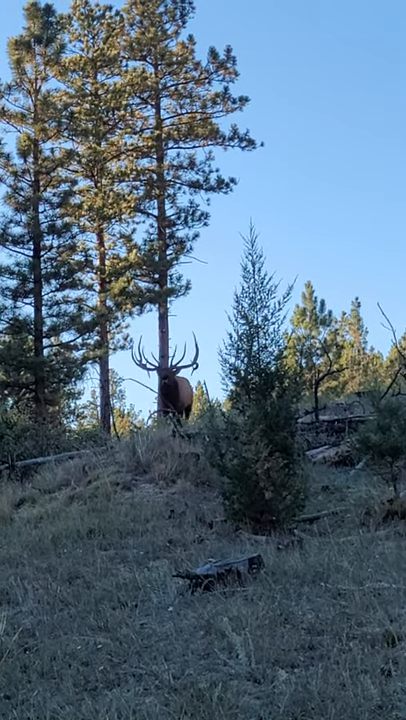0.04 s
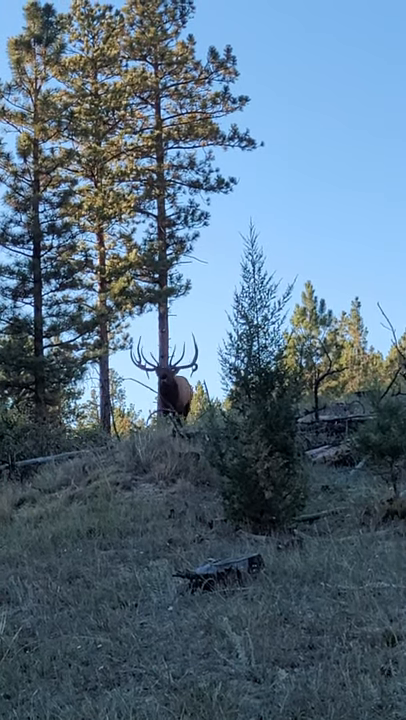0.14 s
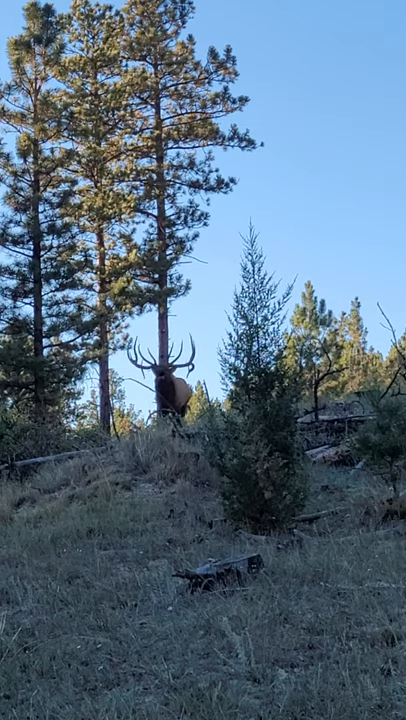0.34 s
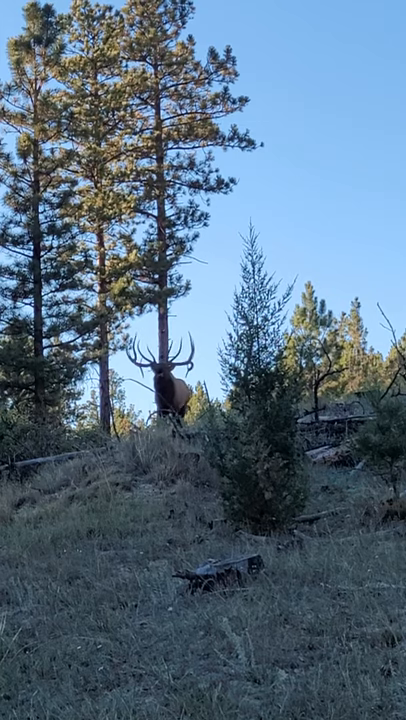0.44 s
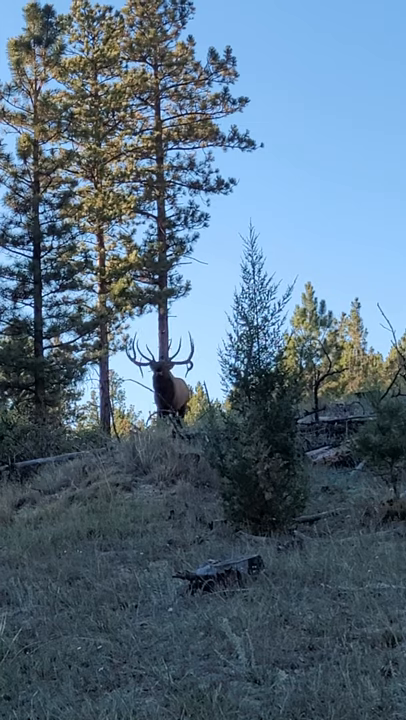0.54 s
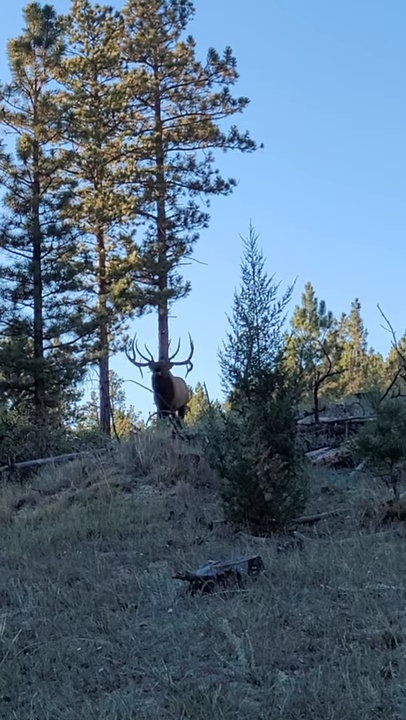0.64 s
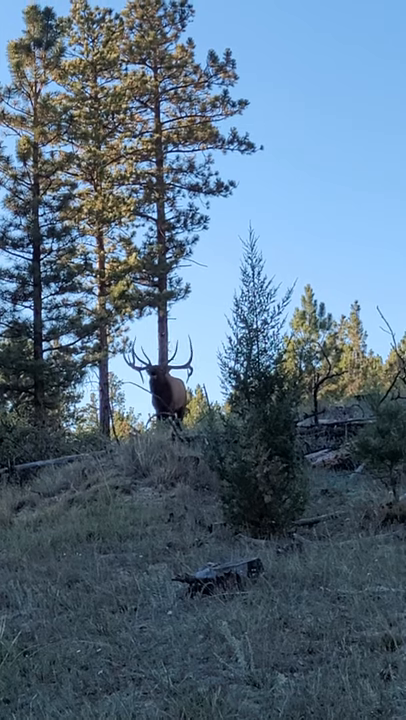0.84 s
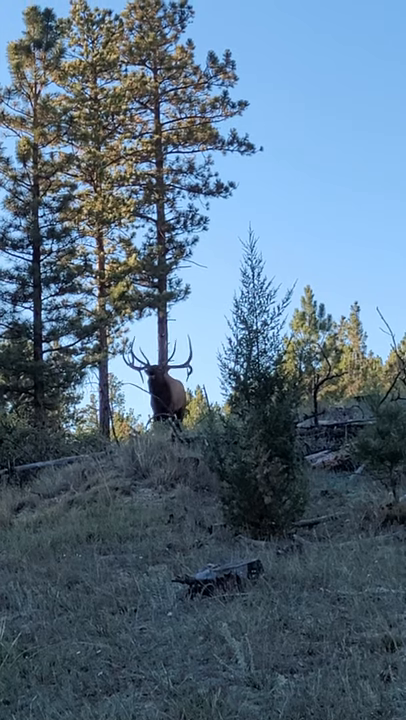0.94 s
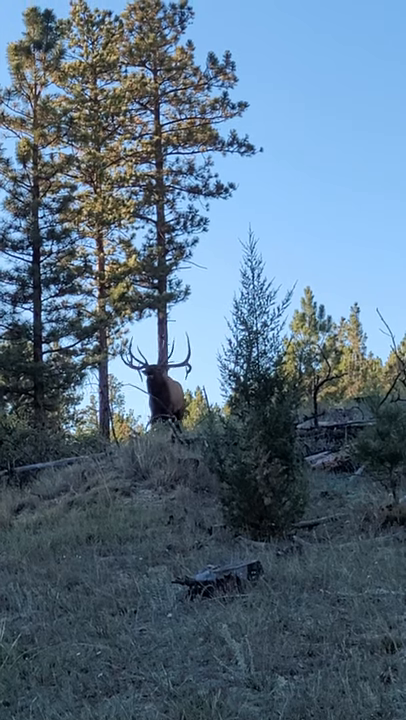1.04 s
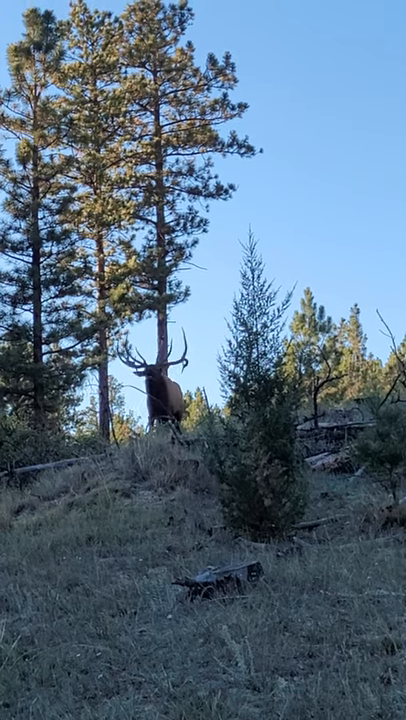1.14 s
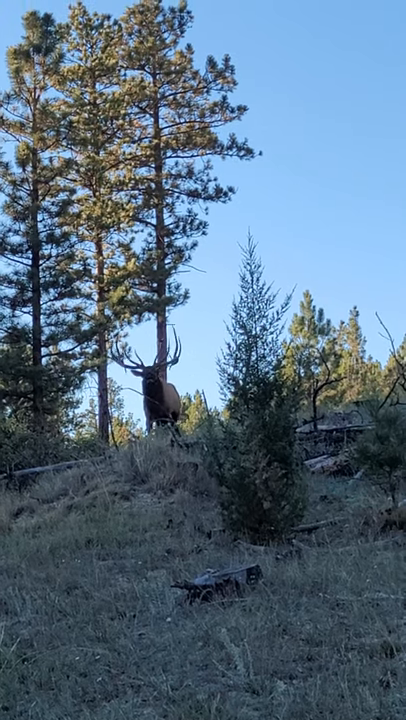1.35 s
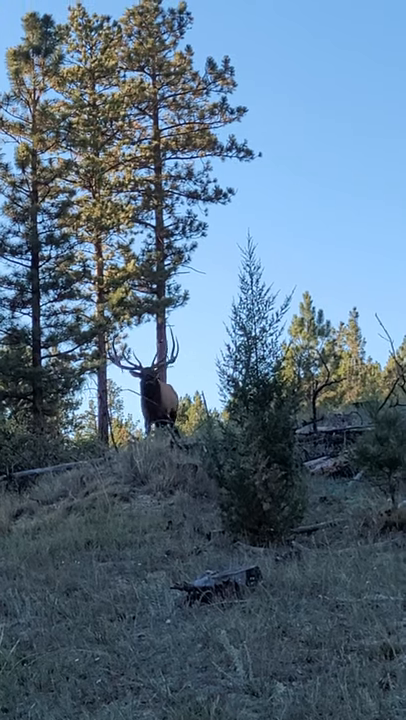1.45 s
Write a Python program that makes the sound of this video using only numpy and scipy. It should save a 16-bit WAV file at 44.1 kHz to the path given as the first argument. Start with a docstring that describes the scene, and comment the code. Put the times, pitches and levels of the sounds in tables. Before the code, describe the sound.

A bull elk bugles in still open air. From 0 s a low growl and breathy rasp roughen a whistle near 900 Hz, which steps upward with small cracks. By about 0.6 s the growl fades; the whistle clears and climbs to a loud, piercing scream near 2.2 kHz around 1.0-1.1 s. It plunges into a short grunt, stopping by 1.2 s, leaving faint echo and thin hiss.

```python
"""A bull elk bugles from a wooded ridge. A low, rough growl and a high whistle sound together: the growl
chops the whistle, then fades while the whistle climbs in steps to a nearly pure scream, and ends in a grunt.
The whistle is a stack of sine waves; growl, flutter and grunt are uneven pulses, and a rasp rings the throat.
Filtered noise makes the rushing air, the still outdoor air and a thin hiss that stays behind.
Dying noise echoes give the faint tail that the slope and pines return."""
import sys
import numpy as np
from scipy import signal
from scipy.fft import rfft, irfft
from scipy.io import wavfile

SR = 44100
rng = np.random.default_rng(int(sys.argv[2]) if len(sys.argv) > 2 else 0)


def master(y):
    """Save y as 16-bit WAV."""
    cut = np.clip(np.atleast_2d(y).T, -1, 1)
    pcm = np.round(cut * 32767)  # scale
    wavfile.write(sys.argv[1], SR, pcm.astype(np.int16))


N = 66150

# Path of the whistle's pitch. Each row: time in seconds, pitch in Hz.
WHISTLE_PITCH = [(0, 907.4), (.1, 919.7), (.15, 949.6), (.172, 1037), (.21, 1037), (.245, 973.7),
                 (.32, 1029), (.365, 1106), (.385, 1222), (.42, 1276), (.47, 1274), (.52, 1315),
                 (.572, 1316), (.59, 1510), (.608, 1594), (.626, 1594), (.644, 1718), (.725, 1705),
                 (.76, 1763), (.845, 1793), (.852, 1934), (.872, 1962), (.9, 2015), (.985, 2126),
                 (1.06, 2156), (1.104, 2175), (1.117, 1989), (1.128, 1364), (1.155, 943.5), (1.2, 855.5)]
# Whistle strength before its colour is added. Each row: time in seconds, fundamental in dB, overtones in dB.
WHISTLE_LEVEL = [(0.0, -49.5, -68), (0.07, -46.5, -56.5), (0.14, -29, -55.5), (0.18, -40, -60.5),
                 (.27, -36.5, -48.5), (0.35, -31, -43.5), (0.38, -48.5, -40), (0.42, -51, -42),
                 (0.51, -54, -38), (0.56, -45.5, -45.5), (0.595, -41.5, -34), (0.62, -28, -36.5),
                 (0.65, -40, -38.5), (0.73, -39.5, -40), (0.78, -30.5, -28.5), (0.84, -29.5, -34.5),
                 (0.87, -31.5, -22.5), (0.94, -30, -24.5), (1.0, -24.5, -12.5), (1.1, -25, -17),
                 (1.118, -33, -25.5), (1.135, -51, -40.5), (1.16, -24.5, -56), (1.2, -64, -73.5),
                 (1.23, -79, -106)]
# Overall colour of the whistle as heard, with a deep gap near 9400 Hz. Each row: frequency in Hz, gain in dB.
WHISTLE_COLOUR = [(900, -18), (1050, -10.5), (1300, 3.5), (1500, -14.5), (1780, -2.5), (2000, -6.5),
                  (2250, -12), (2550, 4.5), (2850, -0.5), (3300, -11), (3900, -16), (4300, -23),
                  (4600, -11.5), (4900, -30.5), (5400, -17), (6400, -34), (7500, -28), (8600, -36.5),
                  (9400, -67.5), (10800, -43.5), (12000, -49), (14000, -33), (15500, -58)]
# Narrow resonances that ring on after the whistle. Each row: frequency in Hz, time to fall 60 dB in seconds,
# gain in dB.
RINGS = [(1308, 0.24, 15), (1587, 0.22, 10), (1785, 0.23, 2)]
# How deeply the low voice chops the whistle. Each row: time in seconds, depth from 0 to 1.
CHOP = [(0, 0.65), (.14, 0.24), (.3, 0.4), (.4, 0.37), (.52, 0.31), (.56, 0.28), (.59, 0.21), (.625, 0.17),
        (.7, .08), (.843, 0.09), (.856, 0.6), (.872, 0.12), (1.1, 0.03), (1.125, 0.3)]
# Faint partials midway between the overtones in the scream. Each row: time in seconds, level of each in dB.
HALF_TONES = [(.88, -84), (.95, -74), (.99, -69), (1.1, -66), (1.125, -79)]
# Register breaks, where the pitch turns briefly chaotic. Each row: centre in seconds, half-length in seconds,
# spread of the random pitch error as a fraction.
BREAKS = [(.375, .012, .02), (.583, .016, .028), (.853, .006, .015), (1.125, .014, .11)]
# Low growl of the vocal folds. Each row: time in seconds, pitch in Hz, level in dB, roughness (0 is steady).
GROWL = [(0, 109.8, -52, 0.16), (.05, 108.8, -48.5, 0.23), (.11, 102.9, -48.5, 0.1),
         (.23, 103.7, -46.5, 0.25), (.285, 110.2, -46.5, 0), (.34, 111.3, -48.5, 0.5),
         (.42, 120.3, -48.5, 0.7), (.54, 124.3, -55.5, 0.8), (.6, 124.6, -58.5, 1.06),
         (.65, 123.4, -73, 0.69)]
# Body of the growl. Each row: frequency in Hz, strength in relative dB.
GROWL_COLOUR = [(105, 6), (210, 7), (310, -9), (420, -37), (530, -4), (650, -11.5), (800, -53), (1400, -48),
                (3000, -52)]
# A higher flutter in the throat that takes over. Each row: time in seconds, pitch in Hz, level in dB, roughness.
FLUTTER = [(.08, 160.6, -84, 0.4), (.13, 158.8, -59.5, 0), (.23, 159.1, -64, 0.25),
           (.31, 167.9, -39.5, 0.77), (.36, 165.9, -43, 0.49), (.39, 163.9, -36, 0.11),
           (.42, 172.2, -43, 0.25), (.47, 175.3, -39.5, .15), (.55, 167.8, -44, 0.09), (.59, 169.9, -65, 0),
           (.62, 174, -54, 0.6), (.66, 166.2, -80, 0.83)]
# Body of the flutter. Each row: frequency in Hz, strength in relative dB.
FLUTTER_COLOUR = [(170, 5.5), (340, -12), (510, -34.5), (680, -8.5), (850, -48), (1500, -36)]
# Closing grunt. Each row: time in seconds, pitch in Hz, level in dB, roughness.
GRUNT = [(1.106, 170.3, -51, .8), (1.118, 161.9, -53, 1), (1.138, 144.2, -34.5, 0.22),
         (1.16, 127.9, -42, 0.18), (1.182, 113.9, -40.5, 0.18), (1.195, 100.4, -62.5, 0.44),
         (1.23, 94.1, -62.5, 0.25)]
# Body of the grunt. Each row: frequency in Hz, strength in relative dB.
GRUNT_COLOUR = [(60, -5.5), (130, 7), (260, 2), (400, -14.5), (520, -30), (650, 12), (780, -35.5),
                (930, -5), (1400, -9), (2000, -40)]
# The rasp in four gliding throat resonances. Each row: time in seconds, level in dB, then four centres in Hz.
RASP = [(0, -71, 1887, 2800, 4540, 5280), (.12, -54, 1950, 2740, 4580, 5300),
        (.19, -55.5, 1974, 2890, 4250, 5100), (.25, -43.5, 1900, 2800, 4150, 5100),
        (.33, -56.5, 2060, 3080, 4250, 5340), (.375, -48, 2282, 3380, 4520, 5620),
        (.41, -54, 2720, 3757, 4900, 6100), (.52, -42, 2745, 3942, 5300, 6630),
        (.6, -57.5, 2720, 4120, 5420, 7000)]
# Those four resonances. Each row: half-width setting in Hz, share in dB.
RASP_RESONANCES = [(81.5, -3.5), (110, -2), (190, -12.5), (160, -16.5)]
# Strength of the rushing air. Each row: time in seconds, level in dB.
AIR_LEVEL = [(0, -57.5), (.2, -58), (.36, -49.5), (.52, -44), (.585, -41), (.65, -59), (.75, -64.5),
             (.88, -65), (.98, -56.5), (1.104, -63), (1.113, -49), (1.135, -44.5), (1.16, -40),
             (1.195, -61), (1.24, -101)]
# Colour of the rushing air. Each row: frequency in Hz, strength in relative dB.
AIR_COLOUR = [(50, -44.5), (120, -2), (350, 3), (650, 0), (800, -15.5), (1000, 9), (1300, -16.5),
              (1600, -10), (1900, 1.5), (2200, -16.5), (2650, 15), (3400, -13.5), (4000, 0.5), (4550, -1),
              (5000, -12), (6000, -8), (8000, -15), (9300, -55), (15000, -21.5)]
# The call at the two microphones. Each row: frequency in Hz, left minus right in dB, lead of the left in radians.
EARS = [(171, -0.5, 0.11), (600, 0, 0.96), (816, 0, -2.3), (1240, -0.5, 2.44), (1140, -3, 1.07),
        (1550, 1, 0.5), (1859, -1.5, 0.7), (1833, -28, -0.7), (2010, 5.5, 1.31), (2420, -7.5, 0.1),
        (3443, -0.5, 0.5), (3350, -5, 2), (4054, 11, 0.4), (4200, 2, 0.45), (7400, -1.5, 0.34),
        (8670, 1.5, 1.28), (10250, 3, -2.1), (13100, -8.5, -2)]
# How alike the two channels are for diffuse sound. Each row: frequency in Hz, likeness from 0 to 1.
LIKENESS = [(25, 1), (100, 1), (600, 0.7), (2000, 0.2), (8000, 0.1)]
# Echoes from the near slope, then the far pines. Each row: level in dB, time to fall 60 dB in seconds,
# delay in seconds, thin below this Hz, dull above this Hz.
SCATTER = [(-14, .26, .006, 80, 4500), (-23, .7, .06, 400, 1500)]
# Colour of the still outdoor air. Each row: frequency in Hz, strength in relative dB.
FLOOR_COLOUR = [(25, -9.5), (60, 6.5), (130, -11.5), (350, -3), (640, 1.5), (1400, -8), (2100, -5),
                (3100, -27), (4200, -6.5), (8000, -19), (9500, -23.5), (15000, -32)]
# Colour of the thin high hiss. Each row: frequency in Hz, strength in relative dB.
HISS_COLOUR = [(6000, -19.5), (8500, -12.5), (11000, -10), (13500, -1.5), (15500, -3)]
# Swell of the hiss. Each row: time in seconds, level in dB.
HISS_LEVEL = [(0, -88), (.3, -76.5), (.55, -67), (.8, -67), (1.1, -62.5), (1.5, -62.5)]

OVERTONE_DB_PER_OCTAVE = 4.5   # rise from the second to the fourth partial
CHOP_BRIGHTENS_DB_PER_OCTAVE = 7   # extra rise at full chop depth, until the grunt
JITTER, CHOP_JITTER = .002, .014   # pitch wobble as a fraction: always, and added at full chop depth
CHOP_BEND = .06   # pitch swing within each beat at full chop depth, as a fraction
BEND_OFFSET_RAD = 0.052   # the pitch peaks a little less than a quarter beat after the loudest point
FUNDAMENTAL_CHOP = 0.25   # the fundamental's share of the chop
BREAK_FLUTTER_HZ = 450
HALF_TONE_FLICKER = .5   # spread of the random level, as a fraction
GROWL_JITTER, GROWL_SHIMMER = .14, .55   # random pitch and level spread at roughness 1, as fractions
VOICE_LOW_CUT_HZ = 91
TAKEOVER_S = .34   # from here the flutter, not the growl, beats on the whistle
GRUNT_RING_HZ, GRUNT_RING_T60_S, GRUNT_RING_DB = 646, .34, 2
RASP_BREATHINESS = .5   # noise beside pulses of strength 1
AIR_PULSING = .9   # at full chop depth
FLOOR_DB = -70
CUTOFF_HZ = 15800

TIME = np.arange(N) / SR
PADDED = 2 * N   # room for filters to ring past the end
FREQS = np.maximum(np.arange(N + 1) * SR / PADDED, 1)


def from_db(db):
    """Turn decibels into a plain multiplier."""
    return 10 ** (np.asarray(db) / 20)


def rms_one(x):
    """Scale to an average strength (rms) of 1."""
    return x / np.sqrt(np.mean(x ** 2) + 1e-20)


def in_time(rows):
    """Draw straight lines between rows to get each column at every sample."""
    seconds, *columns = np.transpose(rows)
    return [np.interp(TIME, seconds, column) for column in columns]


def at_hz(points, hz):
    """Read each column of a spectrum at the given frequencies, on a log frequency scale."""
    point_hz, *columns = np.transpose(points)
    return [np.interp(np.log(hz), np.log(point_hz), column) for column in columns]


def filtered(x, response):
    """Multiply each frequency in the sound by a response."""
    return irfft(rfft(x, PADDED) * response, PADDED)[..., :N]


def drift(rate_hz):
    """Smooth random motion with spread 1; a higher rate moves faster."""
    smoothing = 1 / (1 + (FREQS / rate_hz) ** 2)
    return rms_one(filtered(rng.standard_normal(N), smoothing))


def noise(colour):
    """Random noise shaped by a colour table, with an rms of 1."""
    response = from_db(at_hz(colour, FREQS)[0])
    return rms_one(filtered(rng.standard_normal(N), response))


def ring(x, hz, t60):
    """A narrow resonance with gain 1 at its peak keeps sounding after it is driven."""
    radius = np.exp(-np.log(1000) / (t60 * SR))
    feed = np.array([1, 0, -1]) * (1 - radius ** 2) / 2
    feedback = [1, -2 * radius * np.cos(2 * np.pi * hz / SR), radius ** 2]
    return signal.lfilter(feed, feedback, x)


def diffuse(mid, side):
    """Mix two unrelated signals into stereo channels that are most alike in the bass."""
    alike = np.clip(at_hz(LIKENESS, FREQS)[0], 0, 1)
    shared = filtered(mid, np.sqrt((1 + alike) / 2))
    opposite = filtered(side, np.sqrt((1 - alike) / 2))
    return shared + opposite * [[1], [-1]]


def whistle(beat):
    """A near-pure tone with overtones, chopped and bent by each beat of the low voice."""
    hz, = in_time(WHISTLE_PITCH)
    fundamental_db, overtone_db = in_time(WHISTLE_LEVEL)
    depth = np.clip(in_time(CHOP)[0], 0, 1)
    swing = CHOP_BEND * depth * np.sin(beat + BEND_OFFSET_RAD)
    wobble = (JITTER + CHOP_JITTER * depth) * drift(150)
    bent_hz = hz * (1 + swing + wobble)
    chaos = sum(error * np.exp(-((TIME - s) / width) ** 2) for s, width, error in BREAKS)
    phase = 2 * np.pi * np.cumsum(bent_hz * (1 + chaos * drift(BREAK_FLUTTER_HZ))) / SR
    chop = depth * np.cos(beat)

    fundamental_gain = from_db(fundamental_db + at_hz(WHISTLE_COLOUR, hz)[0])
    tone = fundamental_gain * np.sin(phase) * (1 + FUNDAMENTAL_CHOP * chop)
    before_grunt = TIME < GRUNT[0][0]
    slope = OVERTONE_DB_PER_OCTAVE + CHOP_BRIGHTENS_DB_PER_OCTAVE * depth * before_grunt
    for k in range(2, 9):
        db = overtone_db + at_hz(WHISTLE_COLOUR, k * hz)[0] + slope * np.log2(min(k, 4) / 2)
        tone = tone + from_db(db) * np.sin(k * phase) * (1 + chop)

    screaming = (TIME > HALF_TONES[0][0]) & (TIME < HALF_TONES[-1][0])
    half_tone_gain = screaming * from_db(in_time(HALF_TONES)[0])
    halves = half_tone_gain * sum(np.sin((k + .5) * phase) for k in range(1, 4))
    flickering = halves * (1 + HALF_TONE_FLICKER * drift(58.1))
    return (tone + flickering) * np.sqrt(2)   # so that levels count as rms


def low_voice(rows, colour, count):
    """Throat tissue beating unevenly: the sound, as a stack of partials, and the phase of its cycle."""
    hz, db, rough = in_time(rows)
    uneven_hz = hz * (1 + GROWL_JITTER * rough * drift(70))
    phase = 2 * np.pi * np.cumsum(uneven_hz) / SR
    gains = [from_db(at_hz(colour, k * hz)[0]) for k in range(1, count + 1)]
    partials = sum(gain * np.cos(k * phase) for k, gain in enumerate(gains, 1))
    pulses = partials / np.sqrt(sum(gain ** 2 for gain in gains) / 2)
    sounding = (TIME >= rows[0][0]) * (TIME < rows[-1][0])
    level = from_db(db) * (1 + GROWL_SHIMMER * rough * drift(92)) * sounding
    low_cut = 1 / np.sqrt(1 + (VOICE_LOW_CUT_HZ / FREQS) ** 10)
    return filtered(pulses * level, low_cut), phase


def throat_rasp(beat):
    """Each beat of the folds, with a little turbulence, sets the gliding throat resonances ringing."""
    db, *centres = in_time(RASP)
    cycle = np.floor(beat / (2 * np.pi))
    pulses = rms_one(np.clip(np.diff(cycle, prepend=0), 0, 1))   # one click per new cycle
    drive = pulses + RASP_BREATHINESS * rng.standard_normal(N)
    rasp = 0
    for hz, (width_hz, share_db) in zip(centres, RASP_RESONANCES):
        phase = 2 * np.pi * np.cumsum(hz) / SR
        swing = np.array([np.cos(phase), np.sin(phase)])
        # Shift the moving centre down to zero, smooth there, then shift back up.
        held = filtered(drive * swing, 1 / (1 + 1j * FREQS / width_hz) ** 2)
        rasp = rasp + from_db(share_db) * rms_one(np.sum(held * swing, axis=0))
    return rasp * from_db(db) * (TIME < RASP[-1][0])


def rushing_air(beat):
    """Turbulence in the throat is coloured noise, in puffs while the folds beat."""
    depth = np.clip(in_time(CHOP)[0], 0, 1)
    puffs = 1 + AIR_PULSING * depth * np.cos(beat)
    return noise(AIR_COLOUR) * from_db(in_time(AIR_LEVEL)[0]) * puffs


def ringing(x):
    """The narrow resonances pick up whistle and air and hold them."""
    return x + sum(from_db(db) * ring(x, hz, t60) for hz, t60, db in RINGS)


def at_microphones(x):
    """The direct call reaches each side with its own colour and phase."""
    db, lead = at_hz(EARS, FREQS)
    channels = []
    for side in (1, -1):   # left, right
        response = from_db(side * db / 2) * np.exp(1j * side * lead / 2)
        channels.append(filtered(x, response))
    return np.array(channels)


def scatter(x, db, t60, delay, thin_hz, dull_hz):
    """Many small reflections from ground and trees, thin, dull and dying away."""
    fade = from_db(-60 * TIME / t60) * (TIME > delay)
    echoes = diffuse(*rng.standard_normal((2, N))) * fade / np.sqrt(np.sum(fade ** 2))
    colour = 1 / ((1 + 1j * FREQS / dull_hz) * (1 - 1j * thin_hz / FREQS) ** 2)
    return from_db(db) * filtered(x, rfft(echoes, PADDED) * colour)


def background():
    """Still outdoor air and a thin, swelling hiss, both made of wide stereo noise."""
    air = from_db(FLOOR_DB) * diffuse(noise(FLOOR_COLOUR), noise(FLOOR_COLOUR))
    hiss = from_db(in_time(HISS_LEVEL)[0]) * diffuse(noise(HISS_COLOUR), noise(HISS_COLOUR))
    return air + hiss


def scene():
    """Whistle, growl, flutter and closing grunt, heard across the clearing."""
    growl, growl_beat = low_voice(GROWL, GROWL_COLOUR, count=20)
    flutter, flutter_beat = low_voice(FLUTTER, FLUTTER_COLOUR, count=8)
    grunt, grunt_beat = low_voice(GRUNT, GRUNT_COLOUR, count=16)
    grunt = grunt + from_db(GRUNT_RING_DB) * ring(grunt, GRUNT_RING_HZ, GRUNT_RING_T60_S)
    # One low voice at a time beats on the whistle.
    beat = np.select([TIME < TAKEOVER_S, TIME < GRUNT[0][0]], [growl_beat, flutter_beat], grunt_beat)
    whistle_and_air = ringing(whistle(beat) + rushing_air(beat))
    call = whistle_and_air + growl + flutter + grunt + throat_rasp(beat)
    echoes = sum(scatter(call, *row) for row in SCATTER)
    return at_microphones(call) + echoes + background()


def record(dry):
    """A steep low-pass filter removes the very top."""
    low_pass = signal.ellip(12, .1, 80, CUTOFF_HZ, fs=SR, output="sos")
    return signal.sosfilt(low_pass, dry)


dry = scene()
out = record(dry)
master(out)
```